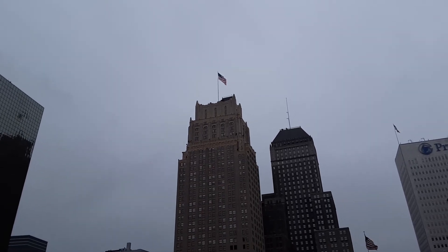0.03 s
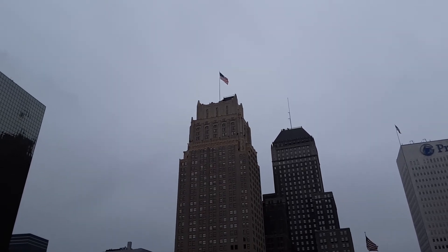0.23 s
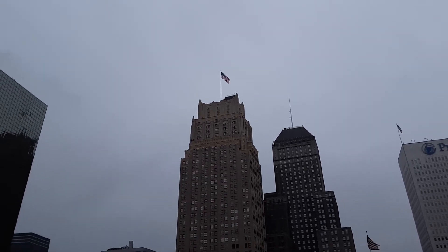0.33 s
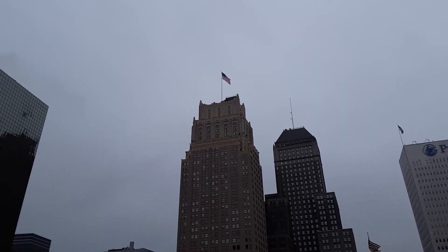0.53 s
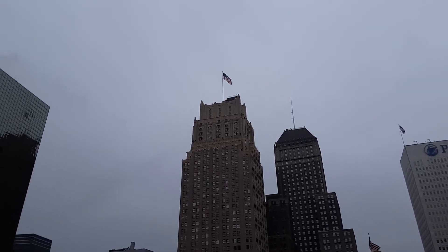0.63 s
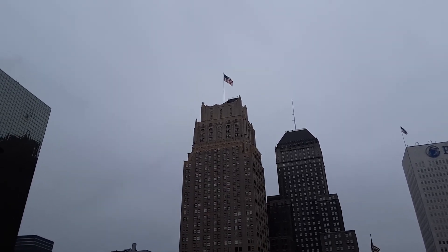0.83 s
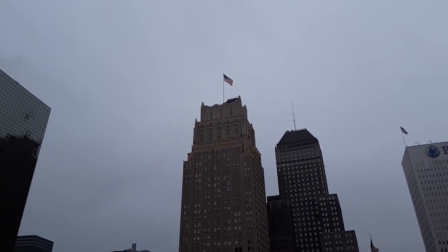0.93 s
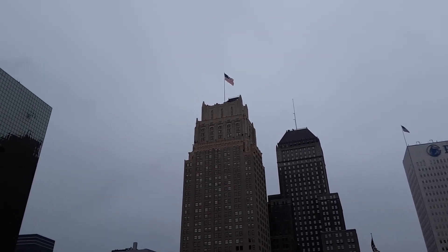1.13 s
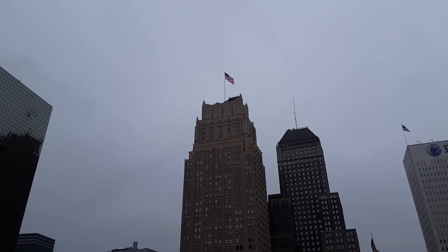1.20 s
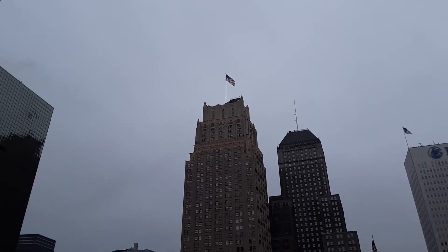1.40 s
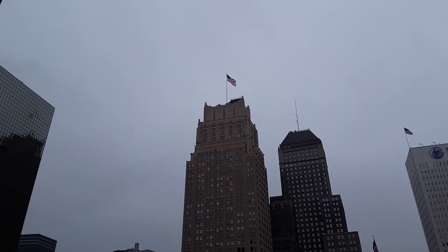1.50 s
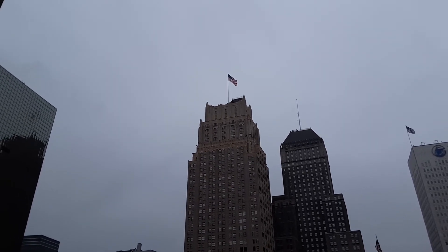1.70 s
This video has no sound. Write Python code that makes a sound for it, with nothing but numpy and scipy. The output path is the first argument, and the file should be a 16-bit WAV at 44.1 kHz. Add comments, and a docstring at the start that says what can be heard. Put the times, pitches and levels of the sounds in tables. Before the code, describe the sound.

A gust of wind buffets the microphone over a steady wash of distant city traffic.

```python
"""A gust of wind buffets a microphone in a street among tall buildings.
Turbulent pressure strikes the two ports separately, thumps hardest on the left and dies away.
Behind it lies the steady wash of distant traffic, a little to the right, with faint whines of
machinery, a thin hiss that has one short swell, and a few ticks and rustles."""
import sys
import numpy as np
from scipy import signal
from scipy.fft import rfft, irfft
from scipy.io import wavfile
from scipy.ndimage import uniform_filter1d

SR = 44100
rng = np.random.default_rng(int(sys.argv[2]) if len(sys.argv) > 2 else 0)


def store_pcm(level_fs):
    """Save levels as 16-bit WAV."""
    pcm = np.round(np.clip(level_fs, -1, 1) * 32767).astype(np.int16)
    wavfile.write(sys.argv[1], SR, np.atleast_2d(pcm).T)


N = 77175
TIME = np.arange(N) / SR
LEFT_LAG_S = .000465  # far sound reaches the right port first


def wind(low_cut_hz=51.6):
    """Turbulent pressure is local: each port meets its own buffeting and its own large eddies."""
    # Each row: time in seconds, wind level at that port in dB.
    left_strength = [(0, -37), (.06, -38.5), (.12, -40.5), (.29, -35.5), (.33, -21.5), (.40, -29),
                     (.465, -42), (.495, -25.5), (.545, -13.5), (.585, -26), (.63, -22.5), (.68, -33),
                     (.72, -25), (.805, -21.5), (.835, -39.5), (1.02, -42), (1.3, -50.5), (1.75, -54)]
    right_strength = [(0, -33.5), (.15, -35.5), (.21, -31), (.34, -27), (.44, -29.5), (.53, -28),
                      (.62, -25.5), (.69, -32.5), (.8, -25), (.9, -30.5), (.95, -37), (1.06, -34),
                      (1.2, -36), (1.32, -48.5), (1.48, -52.5), (1.75, -47.5)]
    # Each row: middle in seconds, peak in dB before the low cut, pitch in Hz, port (0 left, 1 right).
    eddies = [(0.046, -25, 108, 0), (.121, -18.5, 105, 1), (.178, -20.5, 112, 1), (.203, -15, 134, 1),
              (.276, -10.5, 112, 1), (0.3295, -11, 117, 0), (.340, -10.5, 135, 1), (0.348, -15, 121, 0),
              (.397, -13, 166, 0), (.409, -13, 145, 1), (0.487, -8, 233, 0), (0.4978, -8, 115, 0),
              (.531, -5, 367, 0), (.534, -2.5, 149, 0), (.545, -8.5, 366, 0), (.548, -1.5, 114, 0),
              (.554, -16.5, 306, 0), (.629, -8, 127, 0), (0.7021, -11, 235, 0), (.724, -15, 263, 0),
              (0.756, -15.5, 130, 0), (.788, -10.5, 168, 0), (.798, -11.5, 115, 0), (0.882, -18.5, 126, 1),
              (.911, -18.5, 175, 1), (1.0, -20, 276, 1), (1.212, -22, 302, 1), (1.472, -25, 252, 1),
              (1.515, -26, 310, 1)]
    ports = np.array([buffeting(left_strength), buffeting(right_strength)])
    for middle_s, db, hz, port in eddies:
        u = np.pi * hz * (TIME - middle_s)
        ports[round(port)] += amp(db) * (1 - 2 * u ** 2) * np.exp(-u ** 2)  # a push between two dips
    return signal.sosfilt(signal.butter(3, low_cut_hz, "high", fs=SR, output="sos"), ports)


def buffeting(strength, brighten_from_db=-23, octaves_per_db=.1039, deep_from_db=-42.5):
    """Turbulence at one port: faster flow shifts its spectrum upward, and weak flow has little bass."""
    # Each row: frequency in Hz before the shift, relative spectral density in dB.
    spectrum = [(20, -22), (80, -1), (140, -1), (220, -4.5), (320, -18), (480, -22.5), (700, -41),
                (1200, -47)]
    db = over_time(strength)
    stretch = 2 ** (octaves_per_db * np.maximum(db - brighten_from_db, 0))
    cut_hz = 103 / (1 + np.exp((db - deep_from_db) / 2) / 2)
    edges_hz = np.geomspace(20, 1600, 15)
    flow = np.zeros(N)
    for lo, hi in zip(edges_hz, edges_hz[1:]):
        hz = np.sqrt(lo * hi)
        gain = np.sqrt(hi - lo) * amp(over_hz(spectrum, hz / stretch)) / (1 + (cut_hz / hz) ** 4)
        flow += gain * noise(lambda f: (f >= lo) & (f < hi))
    flow /= np.sqrt(uniform_filter1d(flow ** 2, size=1400) + 1e-12)  # unit running rms
    return flow * amp(db + flutter(rms_db=3, below_hz=34.96))


def traffic():
    """Incoherent addition: far streets merge into one wash that wavers a little and slowly fades."""
    # Each row: frequency in Hz, relative spectral density in dB.
    spectrum = [(45, -21), (130, -5), (260, 0.5), (500, -4), (800, -6), (1300, -10), (1900, -10),
                (2300, -12.5), (2750, -14.5), (3100, -20.5), (4300, -22), (5400, -24.5), (5680, -25.5),
                (6000, -32.5), (7200, -27.5), (8300, -37), (9500, -39.5), (11200, -51.5), (12000, -49),
                (15500, -51)]
    # Each row: time in seconds, level in dB.
    level = [(0, -36.5), (.25, -36.5), (.6, -36.5), (.95, -38.5), (1.3, -39), (1.75, -40.5)]
    return distant(spectrum) * amp(over_time(level) + flutter(rms_db=.5, below_hz=25.7))


def machinery(half_width_hz=18):
    """Narrowband noise is heard as wavering tones: far machines whine from the right."""
    # Each row: centre in Hz, rms level at the right port in dB.
    whines = [(1240, -53.5), (1538, -60), (1905, -59.5), (6895, -71)]
    tones = sum(amp(db) * noise(lambda f: 1 / (1 + ((f - hz) / half_width_hz) ** 2))
                for hz, db in whines)
    return np.array([amp(-3.5) * np.roll(tones, round(LEFT_LAG_S * SR)), tones])


def hiss():
    """Amplitude-modulated noise: thin treble flickers, and a brighter band swells once."""
    # Each row: frequency in Hz, relative spectral density in dB.
    thin_spectrum = [(2000, -15), (4200, 13.5), (5800, 7), (7000, 12.5), (9000, -5), (11500, -7),
                     (15500, -40)]
    swell_spectrum = [(3000, -20), (5800, -4), (7000, 15.5), (8000, -1), (9200, 3), (11500, -9),
                      (15500, -20)]
    # Each row: time in seconds, level in dB.
    level = [(0, -64), (.24, -54.5), (.5, -62), (.65, -82), (.82, -78), (.845, -63), (.89, -61.5),
             (1.1, -56), (1.3, -62.5), (1.4, -55.5), (1.62, -64), (1.75, -57.5)]
    thin = distant(thin_spectrum) * amp(over_time(level) + flutter(rms_db=2.85, below_hz=36.8))
    swell = distant(swell_spectrum) * amp(-54.5) * bell(1.476, half_s=.062)
    return thin + swell


def ticks_and_rustles(decay_s=.002):
    """The envelope shapes a noise burst: a sudden onset ticks, a smooth rise and fall rustles."""
    # Each row: start in seconds, level in dB, centre in Hz.
    ticks = [(0.09, -55, 7900), (.829, -51, 7500), (.846, -45, 4400), (1.56, -41.5, 4300),
             (1.570, -49, 7000)]
    # Each row: middle in seconds, level in dB.
    rustles = [(.094, -38), (0.599, -40), (0.944, -41.5)]
    out = np.zeros((2, N))
    for start_s, db, hz in ticks:
        decay = (TIME >= start_s) * np.exp(-abs(TIME - start_s) / decay_s)
        out += amp(db) * decay * stereo_band(hz, octaves=.5)
    envelope = sum(amp(db) * bell(middle_s, half_s=.0082) for middle_s, db in rustles)
    return out + envelope * stereo_band(hz=2010, octaves=.22)


def distant(spectrum, size=1024, patch_db=1.32):
    """Partial coherence: the ports share only part of a far noise, and the left hears it later."""
    # Each row: frequency in Hz, correlation between the ports (clipped to 0-1 below).
    likeness = [(100, 0.23), (500, 0.26), (800, 0), (1150, 0.1), (1700, 0.5), (2500, 0.5), (7500, 0.7),
                (10000, 0.1), (15000, -1.5)]
    # Each row: frequency in Hz, left minus right level in dB.
    balance = [(200, -3.5), (550, 2), (1200, -1.5), (2000, -1), (2700, 1.5), (4300, -2), (7000, -2.5),
               (9000, -3), (10700, -6), (14000, 1)]
    hz = np.fft.rfftfreq(size, 1 / SR)
    draws = rng.standard_normal((5, 4 * N // size + 6, len(hz))).transpose(0, 2, 1)
    right, unshared = draws[0] + 1j * draws[1], draws[2] + 1j * draws[3]
    patches = uniform_filter1d(draws[4], size=8, axis=0)  # level varies over frequency
    patches = unit_rms(uniform_filter1d(patches, size=10, axis=1))  # and over time
    shared = np.clip(over_hz(likeness, hz), 0, 1)[:, None]
    delay = np.exp(-2j * np.pi * hz * LEFT_LAG_S)[:, None]
    left = (shared * right + np.sqrt(1 - shared ** 2) * unshared) * delay
    lean = amp(over_hz(balance, hz) / 2)[:, None]
    gain = amp(over_hz(spectrum, hz)[:, None] + patch_db * patches)
    frames = np.array([left * lean, right / lean]) * gain
    return unit_rms(signal.istft(frames, nperseg=size, noverlap=size - size // 4)[1][:, :N])


def noise(shape):
    """Spectral shaping: white noise weighted by the gain shape(Hz), at rms 1."""
    return unit_rms(irfft(rfft(rng.standard_normal(N)) * shape(np.fft.rfftfreq(N, 1 / SR)), N))


def flutter(rms_db, below_hz):
    """Random modulation: a slow wander of level in dB."""
    return rms_db * noise(lambda f: f < below_hz)


def stereo_band(hz, octaves):
    """Uncorrelated noise at each port, in a Gaussian band of log frequency."""
    return np.array([noise(lambda f: np.exp(-np.log2((f + 1) / hz) ** 2 / (2 * octaves ** 2)))
                     for _ in range(2)])


def bell(middle_s, half_s):
    """A Gaussian envelope in time."""
    return np.exp(-((TIME - middle_s) / half_s) ** 2)


def over_hz(points, hz):
    """Interpolation on a log-frequency axis."""
    f, value = np.transpose(points)
    return np.interp(np.log(hz + 1), np.log(f + 1), value)


def over_time(points):
    """Linear interpolation at every sample."""
    return np.interp(TIME, *np.transpose(points))


def amp(db):
    """Decibels to amplitude ratio."""
    return 10 ** (np.asarray(db) / 20)


def unit_rms(x):
    """Normalisation to rms 1."""
    return x / np.sqrt(np.mean(x ** 2) + 1e-20)


def scene():
    """Superposition: wind pressure and city sound add at each port."""
    return wind() + traffic() + machinery() + hiss() + ticks_and_rustles()


def record(dry, ceiling=.95, edge_hz=15790, fade_s=.003):
    """Soft saturation rounds the hardest thump; the ends fade and a low-pass limits the band."""
    ends = np.sin(np.pi / 2 * np.clip(np.minimum(TIME, TIME[::-1]) / fade_s, 0, 1)) ** 2
    held = dry / (1 + (dry / ceiling) ** 4) ** .25
    low_pass = signal.firwin(1023, edge_hz, window=("kaiser", 9), fs=SR)
    return signal.oaconvolve(held * ends, low_pass[None], "same", axes=1)


dry = scene()
out = record(dry)
store_pcm(out)
```